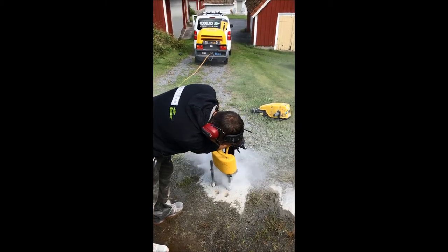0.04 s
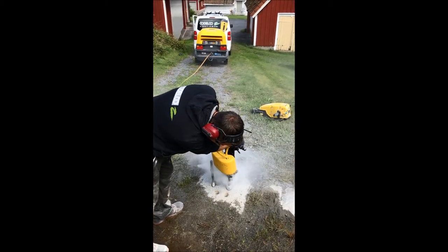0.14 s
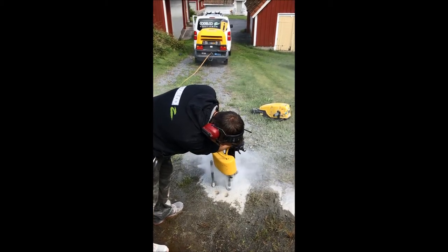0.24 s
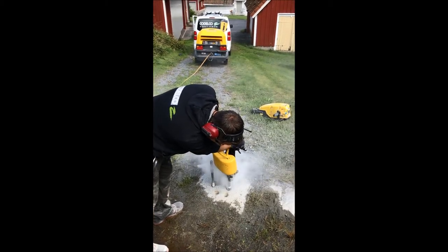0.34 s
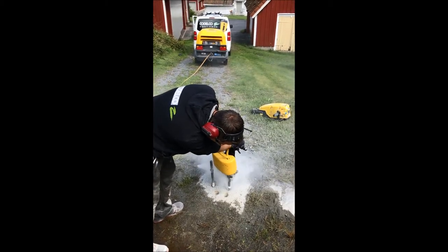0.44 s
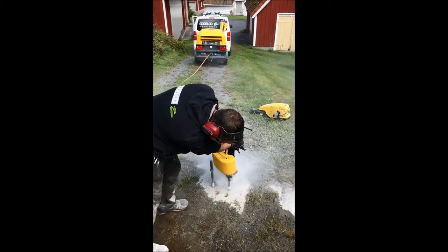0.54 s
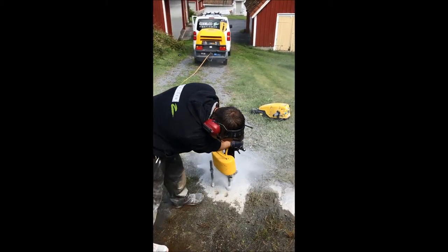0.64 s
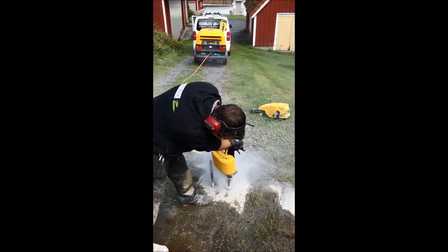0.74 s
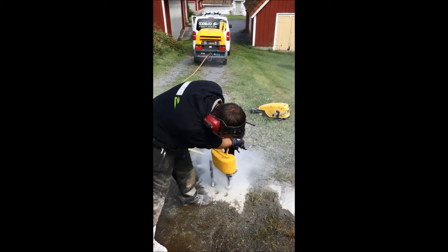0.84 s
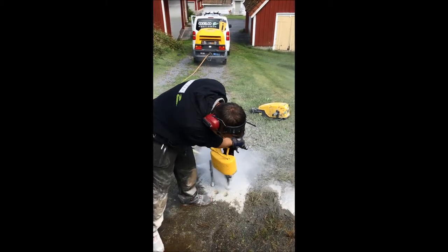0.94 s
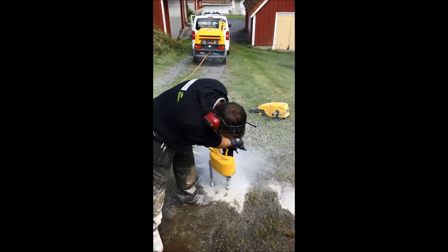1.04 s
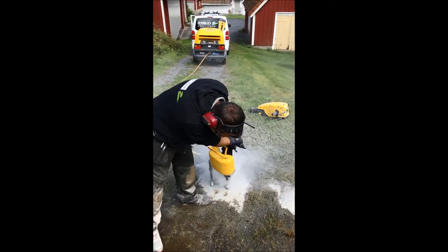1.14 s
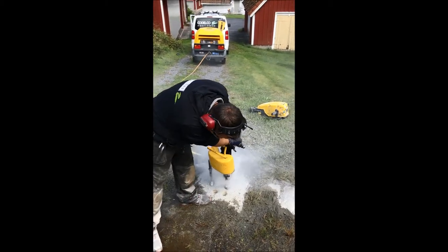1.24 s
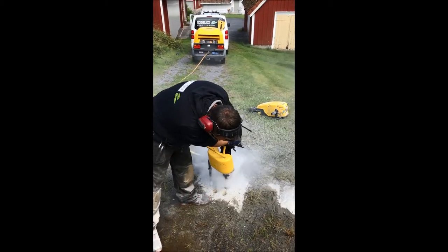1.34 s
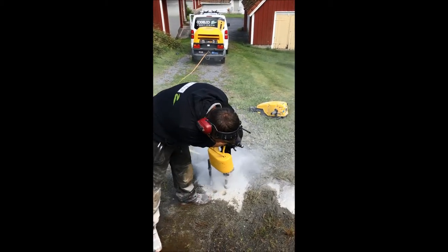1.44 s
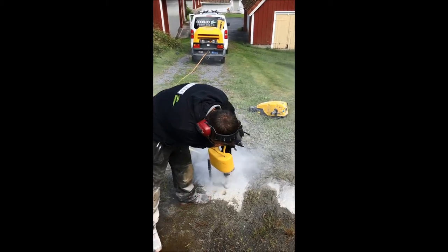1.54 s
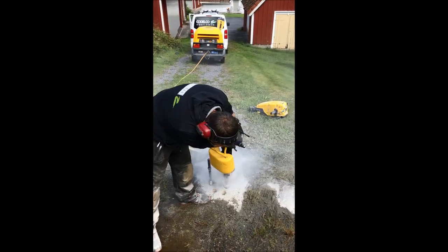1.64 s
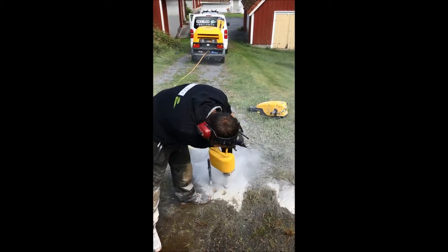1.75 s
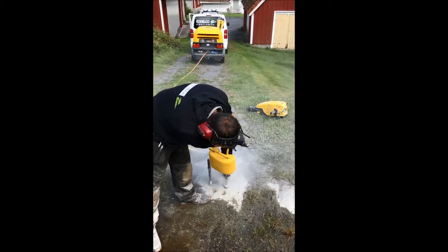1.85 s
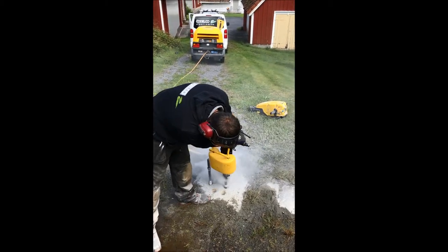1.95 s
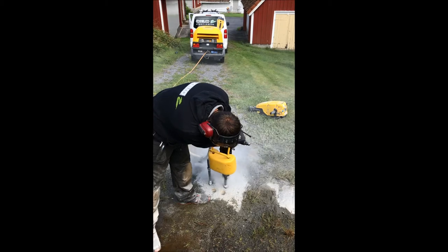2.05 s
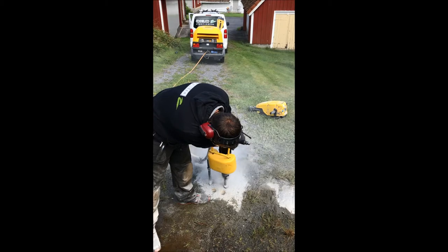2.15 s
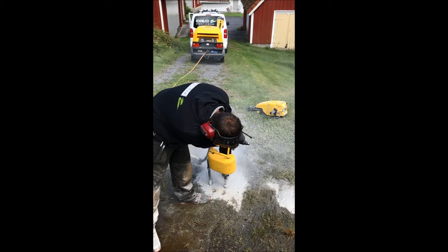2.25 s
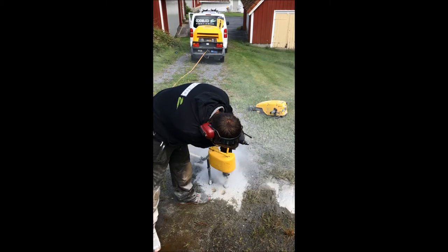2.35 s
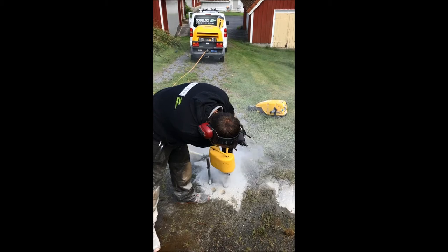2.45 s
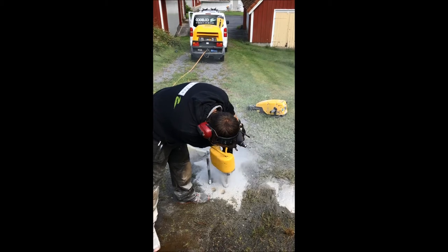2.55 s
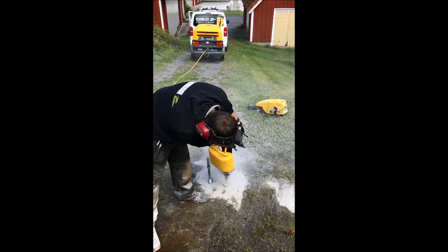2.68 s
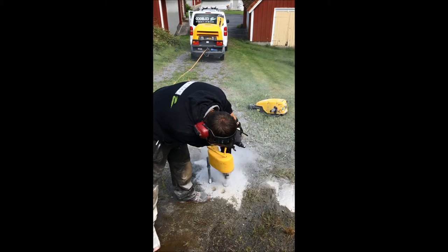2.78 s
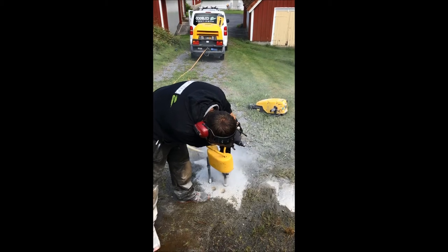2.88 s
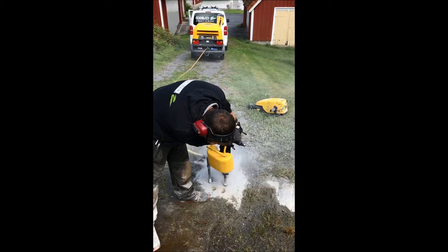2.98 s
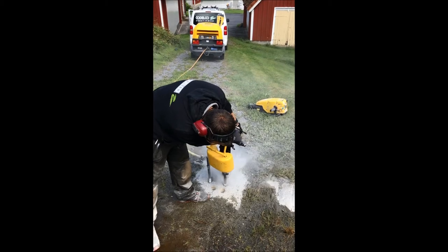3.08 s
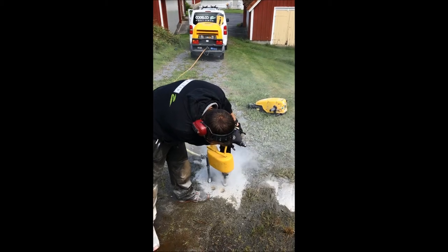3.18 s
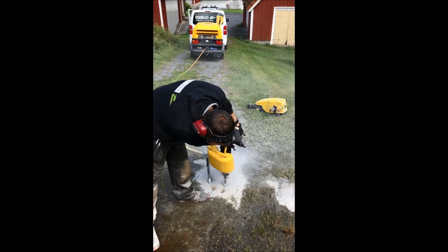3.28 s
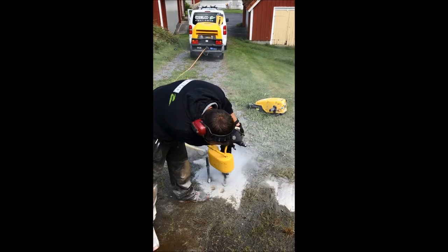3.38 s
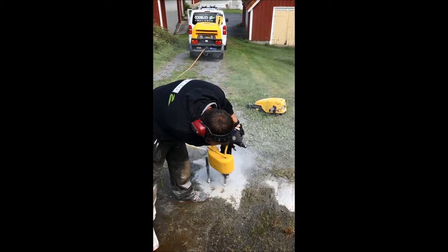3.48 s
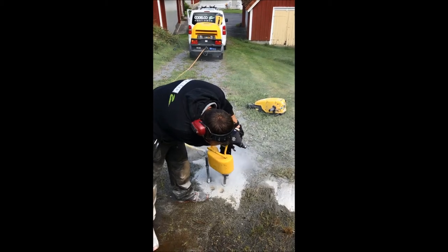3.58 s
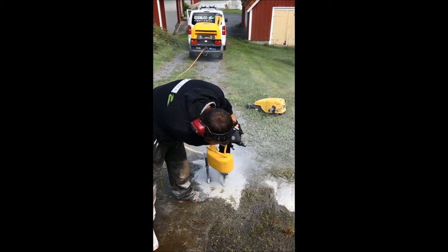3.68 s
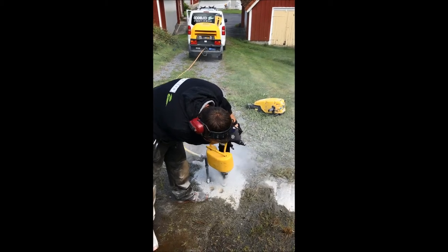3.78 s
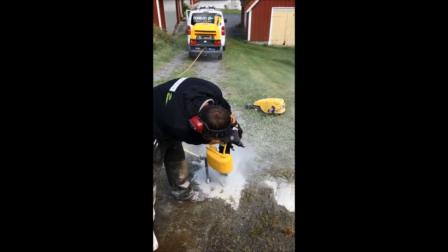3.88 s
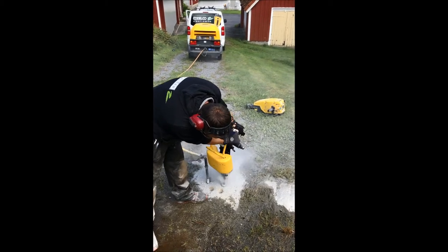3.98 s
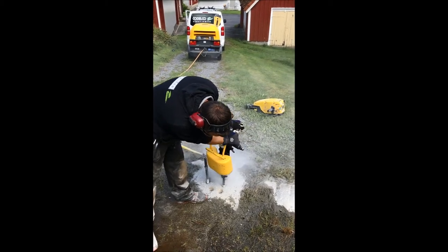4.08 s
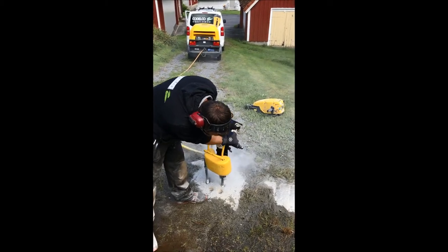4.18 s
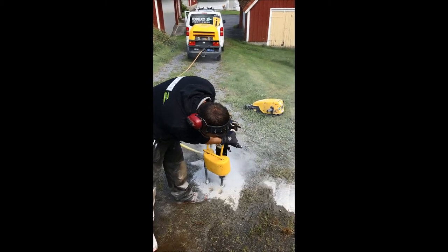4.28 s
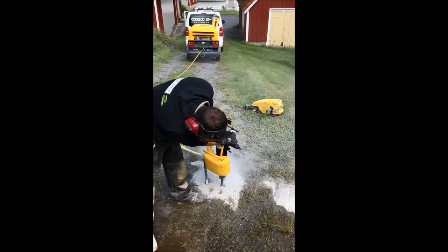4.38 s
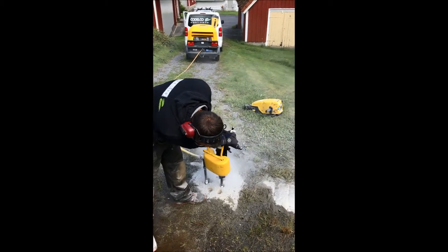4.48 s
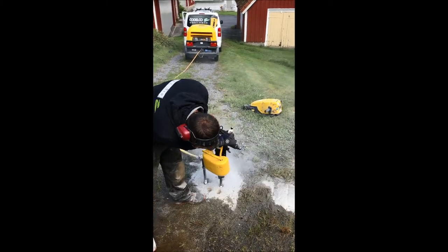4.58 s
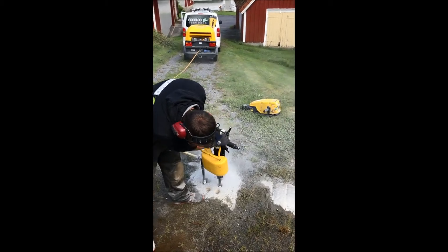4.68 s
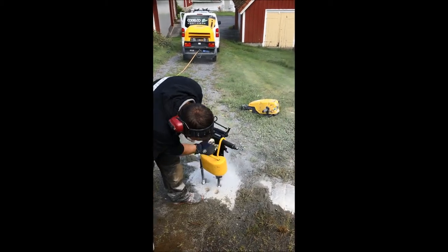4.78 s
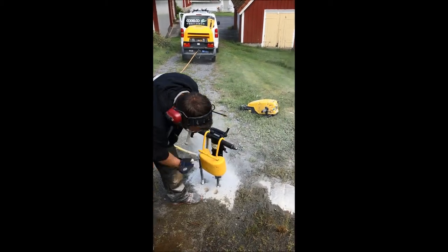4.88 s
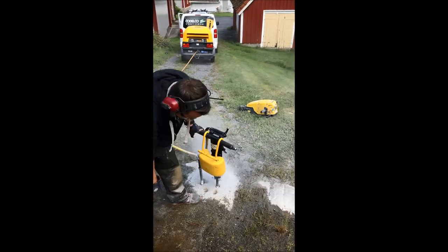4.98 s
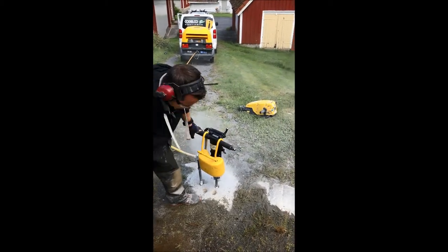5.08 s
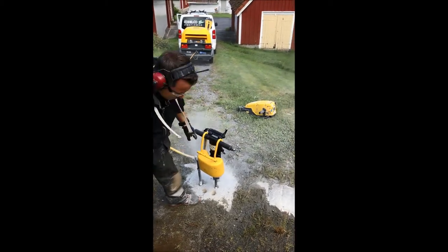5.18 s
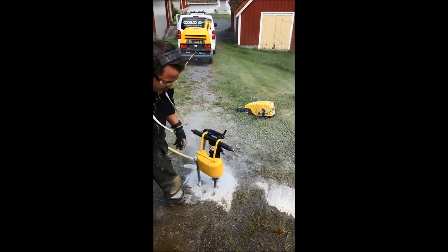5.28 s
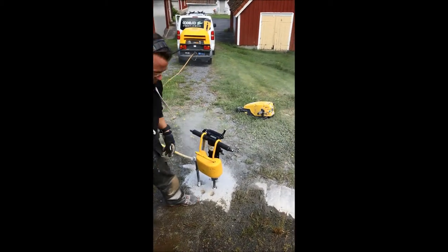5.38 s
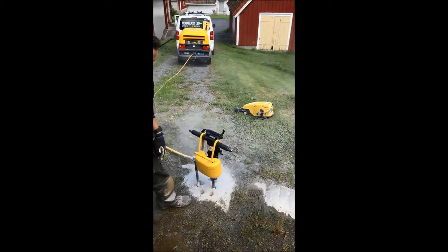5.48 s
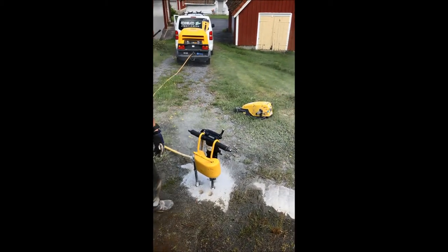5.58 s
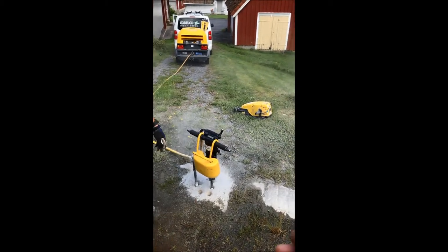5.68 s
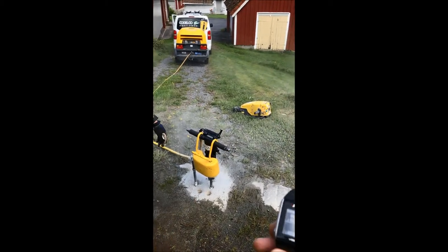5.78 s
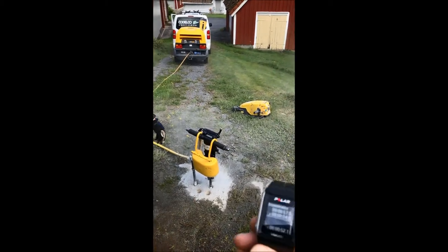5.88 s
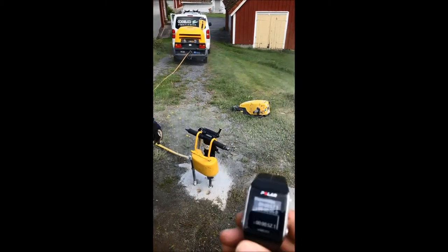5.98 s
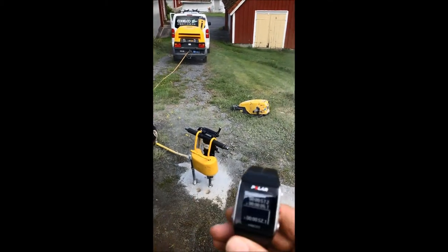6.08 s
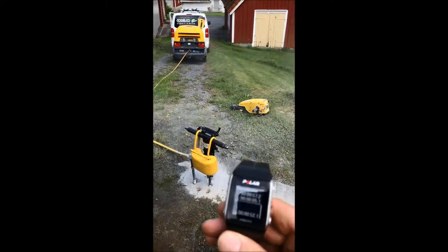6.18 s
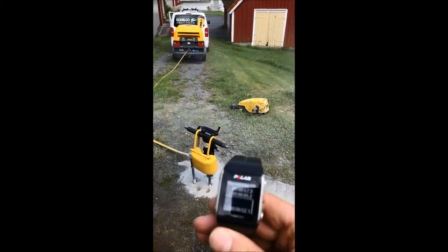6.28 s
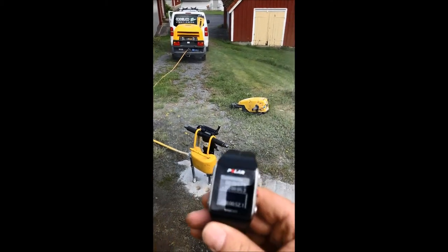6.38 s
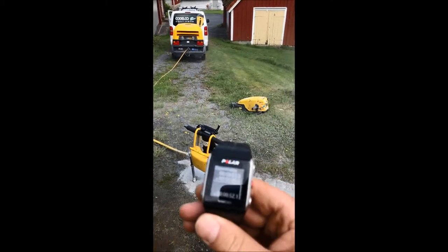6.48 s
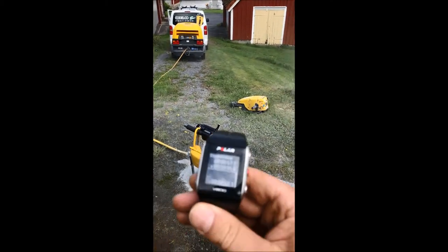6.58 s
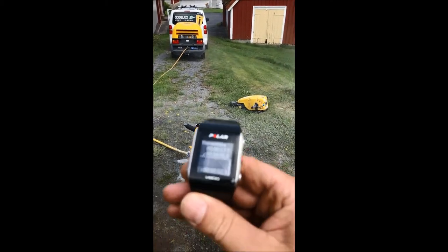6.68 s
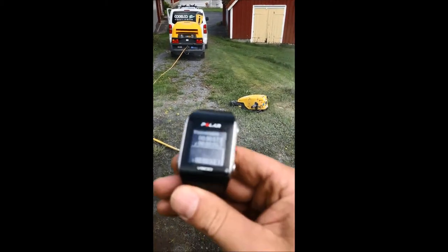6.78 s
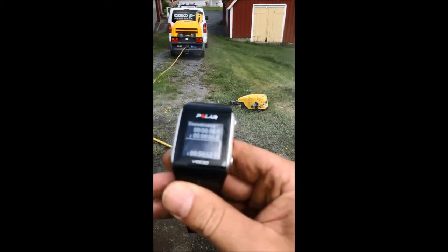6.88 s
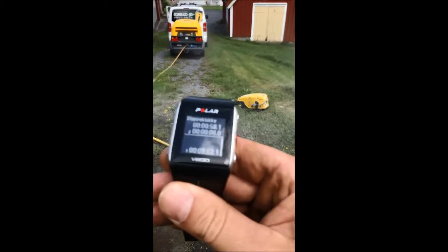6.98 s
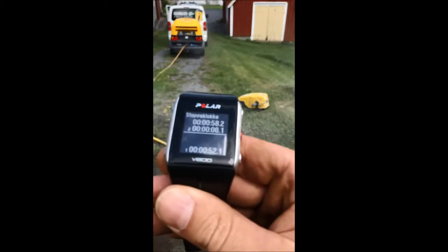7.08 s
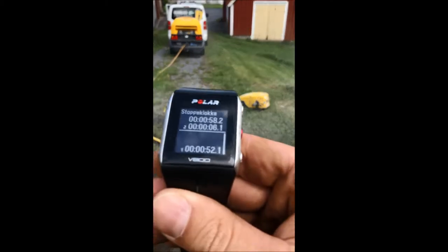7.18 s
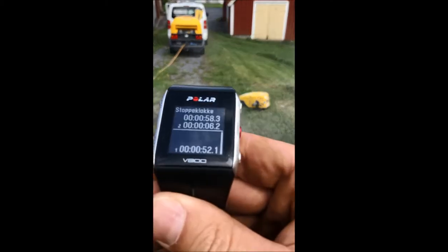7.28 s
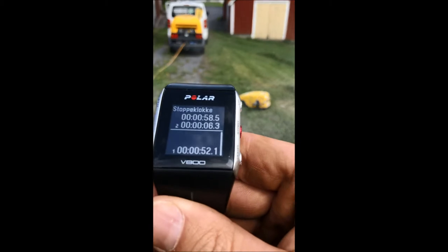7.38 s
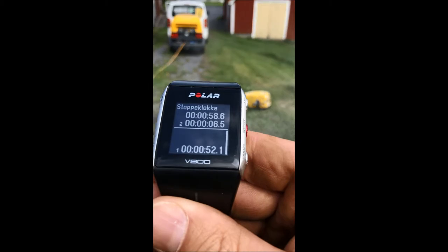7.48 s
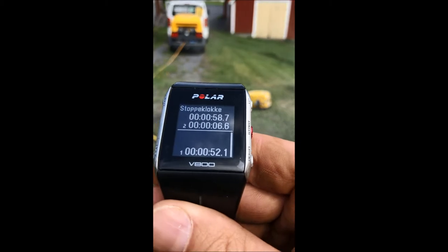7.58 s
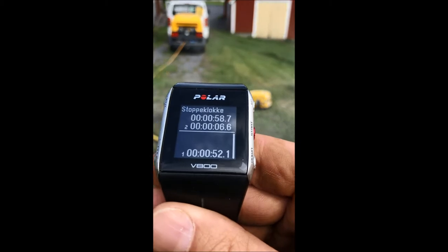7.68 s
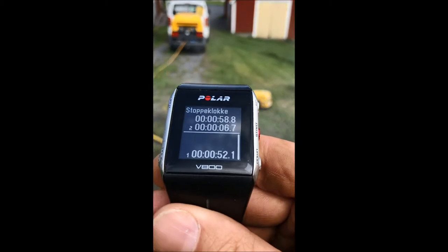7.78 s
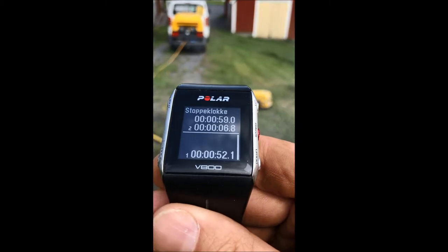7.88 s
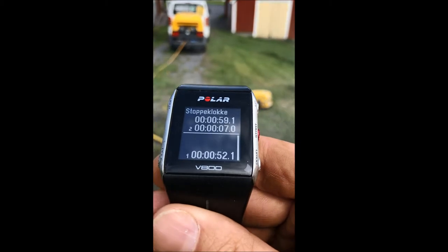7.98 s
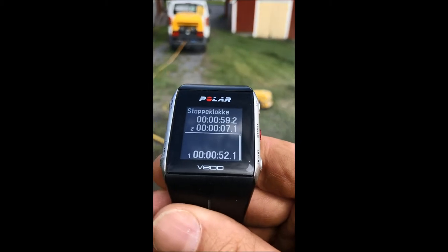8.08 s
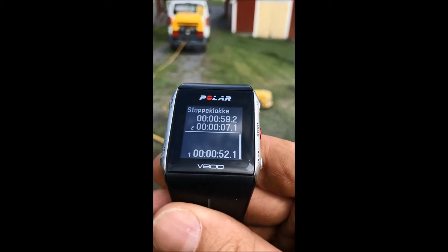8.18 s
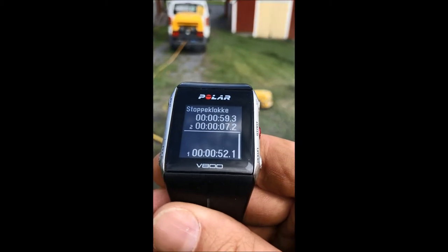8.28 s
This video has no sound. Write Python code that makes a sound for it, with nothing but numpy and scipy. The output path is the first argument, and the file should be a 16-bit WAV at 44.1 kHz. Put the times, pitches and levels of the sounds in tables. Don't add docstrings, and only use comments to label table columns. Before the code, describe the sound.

From 0 to about 4.2 seconds, a handheld pneumatic drill hammers rock very close to the microphone: roughly thirty-two blows per second, each a hollow muffler bark with two hissing air puffs and bright steel chatter. The bit bounces now and then, making the rhythm slightly irregular; short, faint echoes return from nearby buildings. The last blows weaken and stop near 4.2. At 4.26 the lever clicks, a thin high squeak runs to about 4.55, the valve clunks near 4.49 and trapped air puffs out. The microphone gain recovers, exposing a diesel compressor that drops in pitch from 4.4 to 5.2, surging raggedly, with a dull knock at 5.1. From about 5.5 to 8.3 it idles low and lumpy, with irregular panel booms, housing rumble, faint whine and a steady whistling hose leak, slightly softened after 7 seconds. A faint knock falls near 7.6.

```python
import sys
import numpy as np
from scipy import signal
from scipy.io import wavfile
from scipy.ndimage import uniform_filter1d

SR = 44100
rng = np.random.default_rng(int(sys.argv[2]) if len(sys.argv) > 2 else 0)


def file_out(sig):
    cols = np.atleast_2d(sig).T
    lim = np.clip(cols, -1, 1)
    pcm = np.round(lim * 32767).astype(np.int16)
    wavfile.write(sys.argv[1], SR, pcm)


def invert_db(x):
    u = np.asarray(x, float) / 20
    return 10 ** u


N = 367794
T = np.arange(N) / SR

# (time [s], short strokes as the bit bounces [0-2])
PACE = [(.0228, 0), (.2137, 0), (.3353, 0), (.4906, 0), (.5879, 0), (.6785, 2), (.8362, 0), (.9246, 1),
        (1.0146, 1), (1.1391, 0), (1.3654, 0), (1.5562, 0), (1.6441, 2), (1.822, 2), (2.0927, 2),
        (2.2867, 0), (2.4964, 2), (2.5851, 1), (2.7707, 2), (2.8603, 2), (3.0091, 1), (3.0669, 1),
        (3.2195, 1), (3.2782, 2), (3.4608, 1), (3.5188, 2), (3.8568, 1), (3.8845, 1), (3.9433, 2),
        (4.1275, 0)]
# (time [s], air [dB], rattle [dB])
CLOSING_BLOWS = [
    (4.1275, -2.7, -.4),
    (4.1747, -10, -3.8),
]
# (frequency [Hz], width [Hz], level [dB], extra on return stroke [dB])
MUFFLER_MODES = [(65, 220, -1, 8.5), (131, 45, 0, 14), (201, 88, 0, -2), (281, 72, -0.5, 0.5),
                 (427, 61, 2, 3.5), (480, 45, -8.5, -14), (871, 81, -5.5, 2), (1071, 83, 0.5, 1),
                 (960, 78, -0.5, -3)]
# (blow [ms], return stroke [ms])
MUFFLER_PATHS_MS = [(1.6, 3.2), (4.8, 6.2), (5.7, 6.2), (5.8, 5.8), (1.0, 1.0), (1.1, 1.1), (0.1, 0.1),
                    (0.1, 0.1), (0.6, 0.6)]
# (frequency [Hz], density [dB per Hz])
VENT_SPECTRUM = [(300, -8), (700, -18.5), (1060, -7), (1300, -15.5), (1940, -10.5), (3300, -13.5),
                 (4850, -16), (6300, -15), (7600, -18), (9600, -14), (10450, -16.5), (11000, -13.5),
                 (15400, -13.5), (16000, -1.5)]
# (frequency [Hz], width [Hz], level [dB])
STEEL_MODES = [(1486, 85, -3), (1940, 250, -3.5), (2614, 80, -1.5), (2950, 120, 0.5), (3603, 250, 3.5),
               (4436, 100, -0.5), (5320, 250, 0), (6300, 530, 3), (10000, 660, -15)]
# (time [s], firing rate [Hz], level [dB])
ENGINE_RUN = [(4.2, 95.8, -47), (4.362, 96.2, -32), (4.504, 92, -29), (4.65, 85.2, -29.5), (4.754, 80, -26),
              (4.914, 69.5, -32), (5.004, 65.6, -30), (5.12, 63.25, -34), (5.236, 61, -30),
              (5.4, 61.96, -32), (5.6, 61.5, -31.5), (6.5, 61.36, -33), (7.5, 61.66, -32.5),
              (8.34, 61, -33)]
# (multiple of firing rate, level [dB])
UPPER_ORDERS = [(1.5, -24), (2.25, -7.5), (2.75, -17), (3, 3), (3.75, -18), (4, -4), (5, -9), (5.75, -14),
                (11, -21), (12.75, -17.5)]
# (multiple of firing rate, level [dB])
COAST_ORDERS = [(.5, -40), (1.5, -36), (4.249, -46)]
# (time [s], level [dB], length [s])
GOVERNOR_SURGES = [
    (4.57, -40, .08),
    (4.9, -25, 0.056),
    (5.01, -28, 0.021),
    (5.17, -22.5, 0.041),
    (5.26, -26, 0.054),
    (5.45, -31.5, .1),
]
# (frequency [Hz], density [dB per Hz])
EXHAUST_SPECTRUM = [(25, -27), (50, -29), (100, 1.5), (200, -2.5), (340, -12), (430, -18), (520, -21)]
# (frequency [Hz], width [Hz], level [dB])
EXHAUST_PIPES = [(350, 27, -39), (262, 30, -45.5)]
# (time [s], level [dB])
PANEL_BOOMS = [(5.115, -25), (5.19, -24), (5.438, -25), (5.527, -27), (5.655, -37), (5.868, -31),
               (5.952, -25), (6.09, -21), (6.233, -23), (6.286, -32.5), (6.412, -26), (6.562, -25),
               (6.633, -26), (6.688, -29.0), (6.813, -27), (6.898, -25), (6.975, -31), (7.027, -29),
               (7.132, -32), (7.199, -34), (7.259, -23.5), (7.365, -27.5), (7.475, -32), (7.581, -21.5),
               (7.743, -27.9), (7.801, -31), (7.92, -23), (8.14, -30)]
# (multiple of rotor rate, level [dB])
SCREW_LOBES = [(2, -42), (4, -49.5), (18, -53), (19, -64.5), (20, -59)]
# (frequency [Hz], density [dB per Hz])
RUMBLE_SPECTRUM = [(420, -14), (540, -10), (680, -6), (800, -2.5), (1000, -4), (1250, -9.5), (1600, -14),
                   (2000, -13), (2400, -20), (3300, -18.5), (4500, -20), (7000, -28)]
# (frequency [Hz], density [dB per Hz])
LEAK_SPECTRUM = [(2350, -50), (4000, -1), (5760, -6), (8550, -4.5), (10100, -3.5), (12500, -1), (15200, -6),
                 (16000, -9)]
# (frequency [Hz], width [Hz], level [dB])
LEAK_BANDS_CLEAR = [(7260, 150, -7), (8360, 130, -4), (8790, 180, -4), (9330, 110, -7), (10100, 84, -4),
                    (10700, 260, -4), (11600, 58, -5), (12680, 150, 3), (13300, 100, -1), (14000, 97, -4),
                    (14600, 81, -5), (15100, 300, -6)]
# (frequency [Hz], width [Hz], level [dB])
LEAK_BANDS_HAND = [(7230, 72, -5), (8360, 110, -3), (8770, 110, -2), (9320, 100, -6), (10800, 200, -3),
                   (12300, 57, -1), (12700, 93, 0), (13500, 54, -4), (13700, 85, -3), (14000, 110, -3)]
# (time [s], level [dB], length [s])
RELEASE_PUFFS = [
    (4.49, -36.5, 0.11),
]
# (frequency [Hz], width [Hz], level [dB])
RELEASE_MODES = [(704, 96, 0), (860, 160, 0)]
# (time [s], frequency [Hz], level [dB])
SQUEAK_LOW = [
    (4.278, 4990, -54),
    (4.33, 5070, -49),
    (4.35, 5150, -44),
    (4.388, 5190, -42),
    (4.394, 5190, -56),
    (4.402, 5170, -42),
    (4.46, 5180, -45),
    (4.5, 5170, -46),
    (4.545, 5170, -44),
]
# (time [s], frequency [Hz], level [dB])
SQUEAK_HIGH = [
    (4.46, 5330, -54),
    (4.485, 5420, -48),
    (4.505, 5530, -46),
    (4.548, 5540, -45),
]
# (time [s], level [dB], frequency [Hz], width [Hz], tick [dB])
LEVER_CLICKS = [
    (4.259, -27, 5320, 66, -32),
    (4.259, -25.5, 4480, 200, -54),
    (4.486, -21, 1380, 140, -37),
    (4.488, -24, 2300, 200, -50),
    (4.672, -23, 270, 4.6, -70),
    (5.112, -17.5, 239.3, 13, -45),
    (7.566, -34, 210, 38, -50),
]

STROKE_S, BOUNCE_S, REBOUND_S, JITTER_S = .0313, .0268, .0288, .0003
AIR_DB, AIR_LUCK_DB, REBOUND_AIR_DB = 0.5, -0.5, -0.5
RATTLE_DB, RATTLE_LUCK_DB, BOUNCE_RATTLE_DB = 4, 3, 3.5
RETURN_SHARE, RETURN_DB = .555, -4
MUFFLER_DB, VENT_DB, STEEL_DB = -20.5, -19, -20.5
SINK_DB, SINK_S, SINK_HZ = 1.5, 0.89, (2400, 4000)
SHUT_S, DUCK_DB, RECOVER_S = 4.3, -9, .15
COAST_END_S, SETTLE_S, SETTLE_LENGTH_S = 4.83, 5.25, 0.38
SECOND_DB, SECOND_SAG_DB_PER_S, UPPER_DB = -34, -0.9, -36.5
BOOM_HZ, BOOM_WIDE_HZ, BOOM_S, BOOM_BED_DB = 206, 18.3, 0.017, -36.5
SCREW_RATIO = 2.369
RUMBLE_DB, WHINE_DB, LEAK_DB = -43, -43.5, -44
WHINE_ON_S, HAND_S = 4.53, 7.1


def evened(x):
    return x / np.sqrt(np.mean(x ** 2) + 1e-20)


def curves(rows):
    s, *columns = np.transpose(rows)
    return [np.interp(T, s, c) for c in columns]


def train(s, size):
    out = np.zeros(N)
    np.add.at(out, np.clip(np.round(s * SR).astype(int), 0, N - 1), size)
    return out


def resonate(x, hz, width_hz):
    r = np.exp(-np.pi * width_hz / SR)
    return 2 * signal.lfilter([1 - r], [1, -r * np.exp(2j * np.pi * hz / SR)], x).real


def wander(rate_hz):
    steps = rng.standard_normal(1800)
    return np.interp(T * rate_hz, np.arange(len(steps)), steps)


def noise(spectrum, patchy_db, bins=8, hops=14):
    bin_hz = np.fft.rfftfreq(1024, 1 / SR)
    real, imag, patches = rng.standard_normal((N // 256 + 5, 513, 3)).T
    patches = uniform_filter1d(patches, size=int(bins), axis=0)
    patches = evened(uniform_filter1d(patches, size=int(hops), axis=1))
    hz, db = np.transpose(spectrum)
    shape_db = np.interp(np.log(bin_hz + 1), np.log(hz), db, left=-90, right=-90)
    frames = (real + 1j * imag) * invert_db(shape_db[:, None] + patchy_db * patches)
    return evened(signal.istft(frames, nperseg=1024, noverlap=768)[1][:N])


def swell(x, rise_ms, fall_ms):
    t_ms = T[:4000] * 1000
    pulse = (1 - np.exp(-(t_ms / rise_ms) ** 2)) * np.exp(-t_ms / fall_ms)
    return signal.oaconvolve(x, pulse)[:N]


def ramp(s, length_s):
    return np.clip((T - s) / length_s, 0, 1)


def bumps(rows):
    coarse = T[::64]
    power = sum(invert_db(2 * db) * np.exp(-((coarse - s) / length_s) ** 2) for s, db, length_s in rows)
    return np.interp(T, coarse, power)


def duck_db():
    return DUCK_DB * np.exp(-np.maximum(T - SHUT_S, 0) / RECOVER_S)


def blows():
    s, air, rattle = [], [], []
    for (a, before), (b, after) in zip(PACE, PACE[1:]):
        start = a + REBOUND_S * (before > 1)
        end = b - BOUNCE_S * (after > 0)
        strokes = round((end - start) / STROKE_S)
        even = list(np.linspace(start, end, strokes + 1)[:strokes + (after > 0)])
        run = [a] * (before > 1) + even
        place = np.arange(len(run))
        s += run
        air += list(REBOUND_AIR_DB * (before > 1) * (place == 1))
        rattle += list(BOUNCE_RATTLE_DB * (before > 0) * (place == 0))
    luck = np.clip(rng.standard_normal((len(s), 3)), -2, 2).T
    rows = [s + JITTER_S * luck[0],
            air + AIR_LUCK_DB * luck[1] + AIR_DB,
            rattle + RATTLE_LUCK_DB * luck[2] + RATTLE_DB]
    return np.hstack([rows, np.transpose(CLOSING_BLOWS)])


def muffler(s, back_s, push, back):
    out = np.zeros(N)
    for (hz, width_hz, db, back_db), (ms, back_ms) in zip(MUFFLER_MODES, MUFFLER_PATHS_MS):
        vary = invert_db(.6 * rng.standard_normal((len(back_s), 2)))
        kicks = train(s + ms / 1000, push * vary[1:, 0])
        kicks += train(back_s + back_ms / 1000, back * invert_db(back_db) * vary[:, 1])
        soft = uniform_filter1d(kicks, size=int(SR / hz / 4))
        out += invert_db(db) * evened(resonate(soft, hz, width_hz))
    return evened(out)


def vent(s, back_s, air_db, push, back):
    flow = swell(train(s - .0004, invert_db(0.6 * air_db)), 2.76, 4.17)
    back_luck_db = 2.2 * rng.standard_normal(len(back_s))
    flow += swell(train(back_s - .001, back * invert_db(7.5 + back_luck_db)), 5.5, 3.4)
    flow += invert_db(-15.5) * swell(train(np.append(0, s), np.append(1, push)), 1.0, 26.2)
    flow *= invert_db(1.7 * wander(190))
    air = noise(VENT_SPECTRUM, 0.74)
    jet = signal.sosfilt(signal.butter(2, 8500, "highpass", fs=SR, output="sos"), air)
    sharp = abs(evened(flow)) ** 1.5
    return evened(evened(flow) * (air - jet) + evened(sharp) * jet)


def steel(s, rattle_db):
    force = invert_db(0.47 * rattle_db)
    shake = 0.37 * swell(train(s - .0006, force), 0.19, 0.62)
    shake += swell(train(s + 0.0011, force), 1.3, 7.5)
    shake += .7 * swell(train(s + .009, force * invert_db(1.8 * rng.standard_normal(len(s)))), 2.1, 8)
    shake += swell(train(np.zeros(1), force[0]), .1, 3.1)
    chatter = shake * (rng.random(N) < 11000 / SR) * rng.standard_normal(N)
    out = np.zeros(N)
    for hz, width_hz, db in STEEL_MODES:
        free_db = SINK_DB * (SINK_HZ[0] < hz < SINK_HZ[1]) * (1 - ramp(SINK_S - .2, .4))
        grip = invert_db(1.5 * wander(22) + free_db)
        out += invert_db(db) * evened(resonate(chatter * grip * rng.standard_normal(N), hz, width_hz))
    return evened(out)


def drill():
    s, air_db, rattle_db = blows()
    s = s - .0006
    gap_s = np.minimum(np.diff(s, append=s[-1] + .04), .036)
    back_s = np.append(.007, s + RETURN_SHARE * gap_s - .0022)
    back_s = back_s + .0004 * rng.standard_normal(len(back_s))
    push = invert_db(0.12 * air_db + np.minimum(air_db, 0))
    back = np.append(push[0], push) * invert_db(RETURN_DB)
    out = invert_db(MUFFLER_DB - 0.94) * muffler(s, back_s, push, back)
    out += invert_db(VENT_DB + 0.02) * vent(s, back_s, air_db, push, back)
    return out + invert_db(STEEL_DB - 4.5) * steel(s, rattle_db)


def walls(x):
    at, out = np.arange(300, 9000, 22), np.zeros(N)
    for k in range(3):
        signs = rng.choice([-1., 1.], len(at)) * invert_db(-60 * at / SR / .25)
        taps = train((at + rng.integers(0, 22, len(at))) / SR, signs)[:9100]
        share = np.sqrt(2 / 3) * np.cos(np.pi * (3 * T + k / 3))
        out += signal.oaconvolve(x * share, taps / np.linalg.norm(taps))[:N]
    return out


def panel():
    shake = np.sqrt(invert_db(2 * BOOM_BED_DB) + bumps([(s, db, BOOM_S) for s, db in PANEL_BOOMS]))
    phase = 2 * np.pi * np.cumsum(BOOM_HZ + .5 * BOOM_WIDE_HZ * wander(25)) / SR
    return shake * invert_db(1.0 + 0.82 * wander(30)) * np.sin(phase) * ramp(4.8, 0.17)


def screw(turn):
    return sum(invert_db(db + 0.37 * wander(28)) * np.sin(k * SCREW_RATIO * turn + 6 * rng.random())
               for k, db in SCREW_LOBES)


def engine():
    hz, first_db = curves(ENGINE_RUN)
    idle = ramp(SETTLE_S, SETTLE_LENGTH_S)
    ragged = 1 - idle
    turn = 2 * np.pi * np.cumsum(hz) / SR
    steady_db = SECOND_DB + SECOND_SAG_DB_PER_S * (T - 5.6) - 3.9 * ragged + 0.67 * duck_db()
    second = np.sqrt(invert_db(2 * steady_db) + bumps(GOVERNOR_SURGES)) * invert_db(0.89 * wander(6.2))
    out = np.sqrt(2) * (invert_db(first_db) * np.sin(turn) + second * np.sin(2 * turn + 1))
    upper = np.zeros(N)
    for k, db in UPPER_ORDERS:
        order_db = db + (3.0 + 3.4 * ragged) * wander(14) - 8.5 * ragged
        upper += invert_db(order_db) * np.sin(k * turn + 6 * rng.random())
    wash = invert_db(-3.5 + 4.5 * ragged) * noise(EXHAUST_SPECTRUM, 0.78)
    upper_db = UPPER_DB - 0.78 * ragged + 0.62 * duck_db()
    out += invert_db(upper_db + 4.0) * (upper + wash)
    coasting = ramp(4.33, 0.19) * (1 - ramp(5.0, .1))
    for k, db in COAST_ORDERS:
        out += coasting * invert_db(db + duck_db() + 3.8 * wander(11)) * np.sin(k * turn)
    for pipe_hz, width_hz, db in EXHAUST_PIPES:
        ring = evened(resonate(rng.standard_normal(N), pipe_hz, width_hz))
        out += ragged * invert_db(db + duck_db()) * ring
    return out + panel() + np.sqrt(2) * idle * screw(turn)


def leak_bands(white, rows):
    return evened(sum(invert_db(db + 1.5 * wander(2.5)) * evened(resonate(white, hz, width_hz))
                      for hz, width_hz, db in rows))


def yard():
    fast = 1 - ramp(COAST_END_S - .08, 0.26)
    unsettled = 1 - ramp(SETTLE_S, SETTLE_LENGTH_S)
    hand = ramp(HAND_S - .25, 0.39)
    silent = 1 - ramp(WHINE_ON_S - .02, .04)
    rumble_db = RUMBLE_DB + 6.4 * fast - 1.6 * unsettled + 0.96 * hand + 0.5 * duck_db()
    whine_db = WHINE_DB + 5.7 * fast - 8.8 * unsettled - 2.6 * hand - 6.8 * silent
    leak_db = LEAK_DB + 0.25 * fast - 2.8 * unsettled - 1.01 * hand + 0.9 * duck_db()
    white = rng.standard_normal(N)
    whine = np.zeros(N)
    for gain, hz, width_hz in [(1, 2775, 51), (.26, 2750, 320), (.43, 3240, 110), (.33, 2020, 150)]:
        whine += gain * evened(resonate(white, hz, width_hz))
    bands = np.sqrt(1 - hand) * leak_bands(white, LEAK_BANDS_CLEAR)
    bands += np.sqrt(hand) * leak_bands(white, LEAK_BANDS_HAND)
    leak = noise(LEAK_SPECTRUM, 2.8, bins=4, hops=110) + 1.05 * bands
    release = sum(invert_db(db) * evened(resonate(white, hz, width_hz)) for hz, width_hz, db in RELEASE_MODES)
    out = np.sqrt(bumps(RELEASE_PUFFS)) * evened(release)
    out += invert_db(rumble_db + 3.5) * noise(RUMBLE_SPECTRUM, 1.3)
    out += invert_db(whine_db + 3.0 + 1.3 * wander(16)) * evened(whine)
    return out + invert_db(leak_db + 4.5) * evened(leak)


def lever():
    out = np.zeros(N)
    for rows in (SQUEAK_LOW, SQUEAK_HIGH):
        hz, db = curves(rows)
        on = uniform_filter1d(1. * (T > rows[0][0]) * (T < rows[-1][0]), size=200)
        phase = 2 * np.pi * np.cumsum(hz + 30 * wander(190)) / SR
        out += np.sqrt(2) * on * invert_db(db - 1 + 2.2 * wander(90)) * np.sin(phase)
    for s, db, hz, width_hz, tick_db in LEVER_CLICKS:
        t = np.maximum(T - s, 0)
        out += (t > 0) * invert_db(db) * np.exp(-np.pi * width_hz * t) * np.sin(2 * np.pi * hz * t)
        out += (t > 0) * invert_db(tick_db) * np.exp(-t / 0.0058) * rng.standard_normal(N)
    return out


def scene():
    near = drill()
    return (near + invert_db(-19) * walls(near) + engine() + yard() + lever())[None]


def roll_off(x):
    return signal.sosfilt(signal.butter(12, 17070, fs=SR, output="sos"), x)


def record(dry):
    thin = signal.sosfilt(signal.butter(4, 42, "highpass", fs=SR, output="sos"), dry)
    limited = 1.065 * np.tanh(thin / 1.127)
    band_edge = signal.firwin(601, 15740, window=("kaiser", 5), fs=SR)
    mix = signal.oaconvolve(limited, band_edge[None], "same")
    return roll_off(mix)


dry = scene()
out = record(dry)
file_out(out)
```